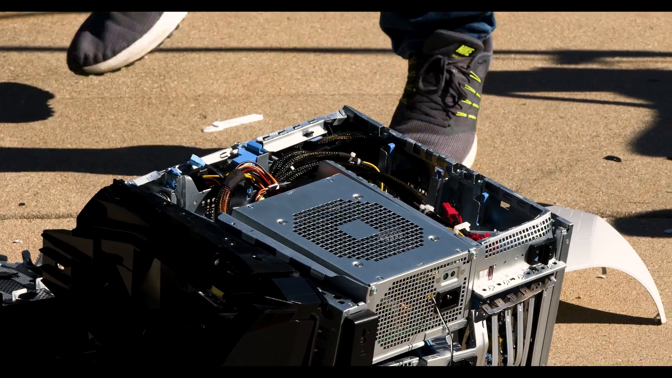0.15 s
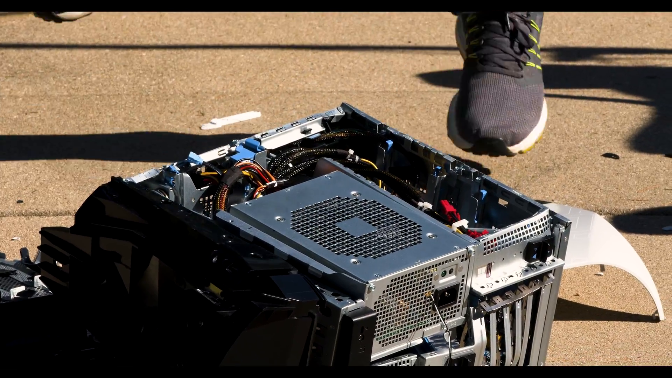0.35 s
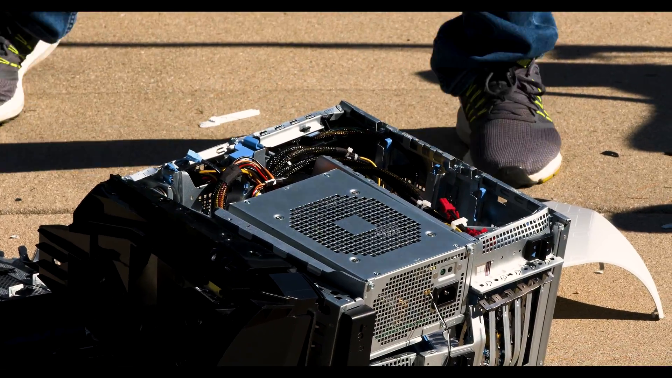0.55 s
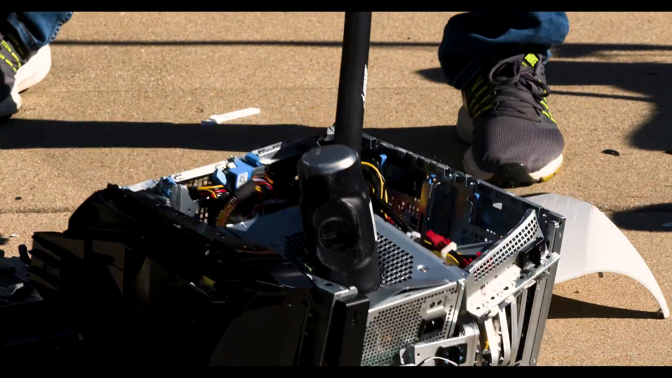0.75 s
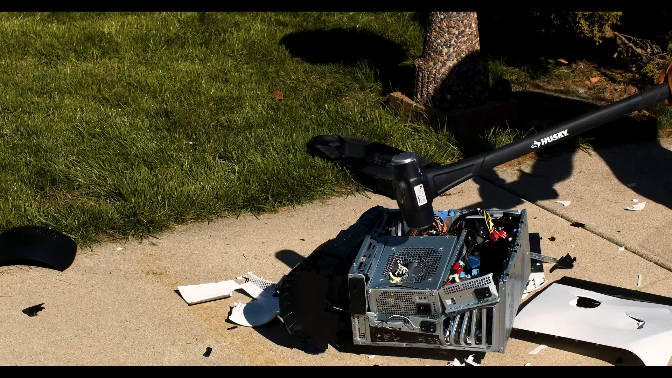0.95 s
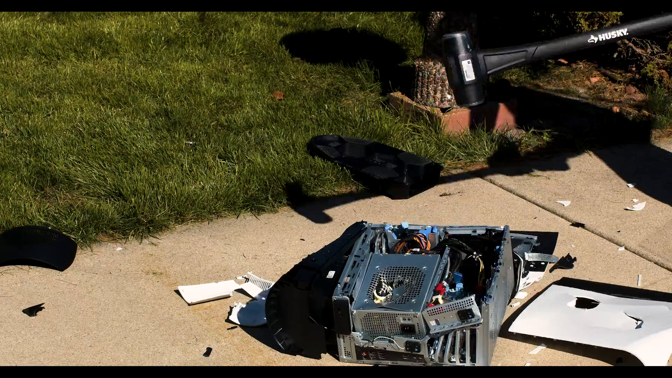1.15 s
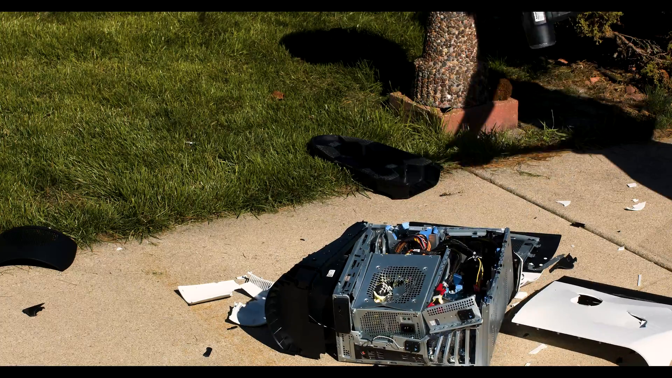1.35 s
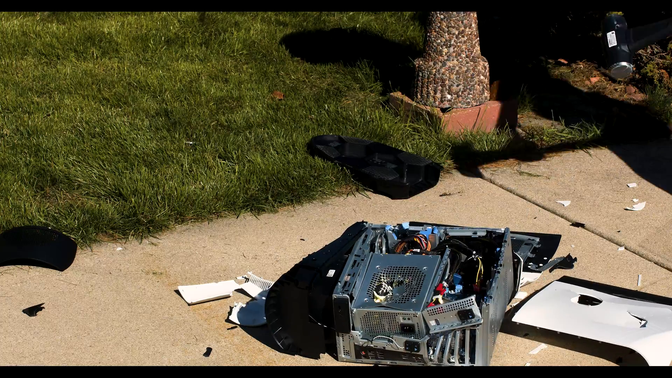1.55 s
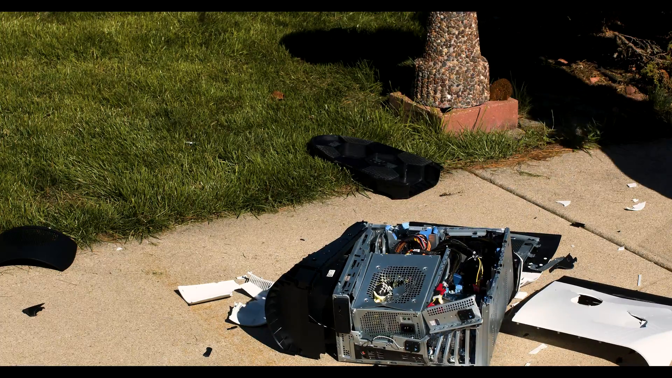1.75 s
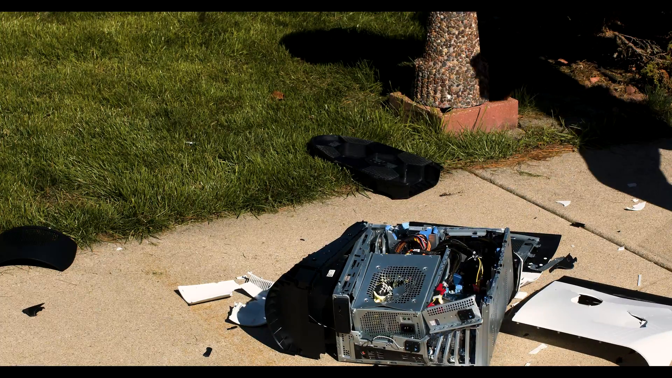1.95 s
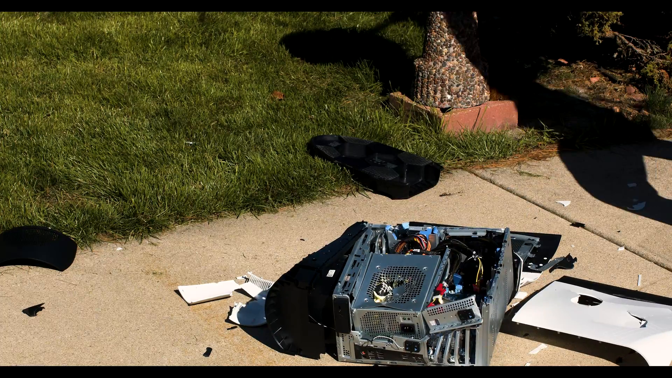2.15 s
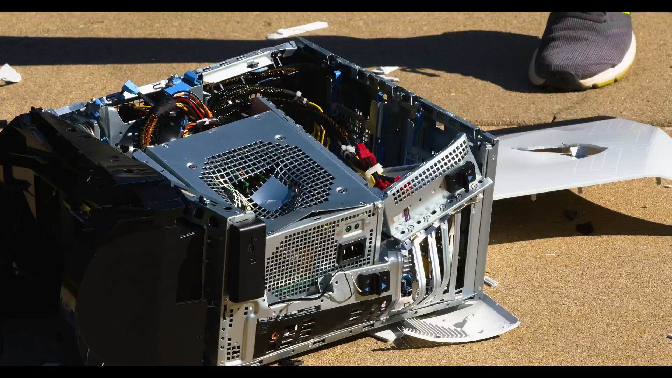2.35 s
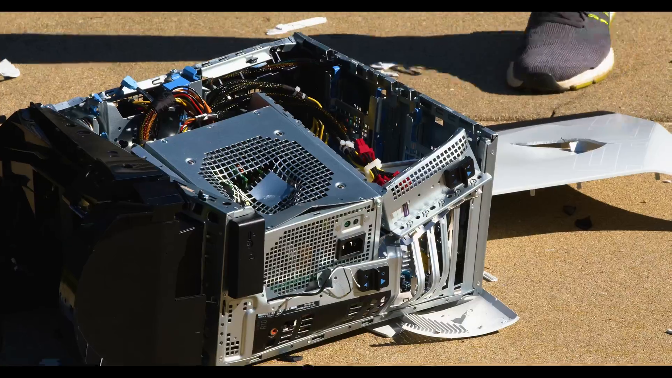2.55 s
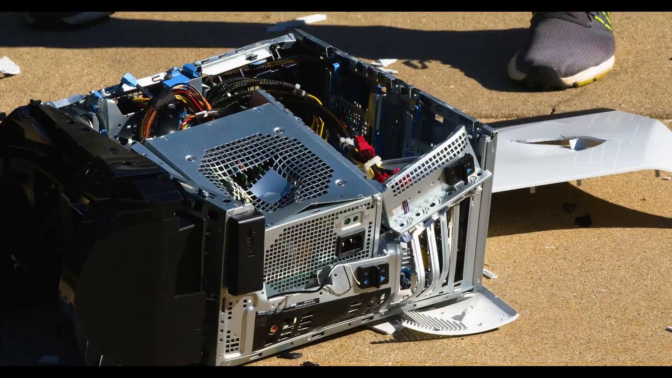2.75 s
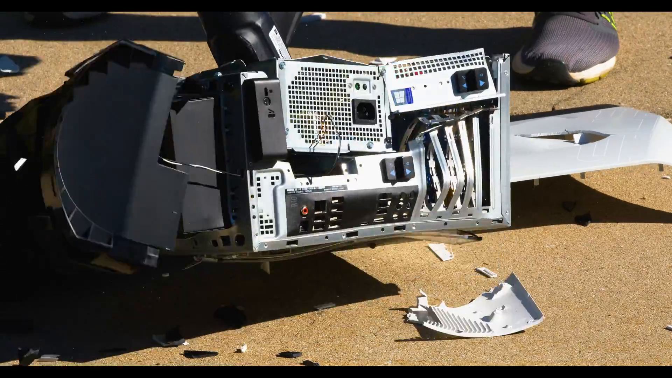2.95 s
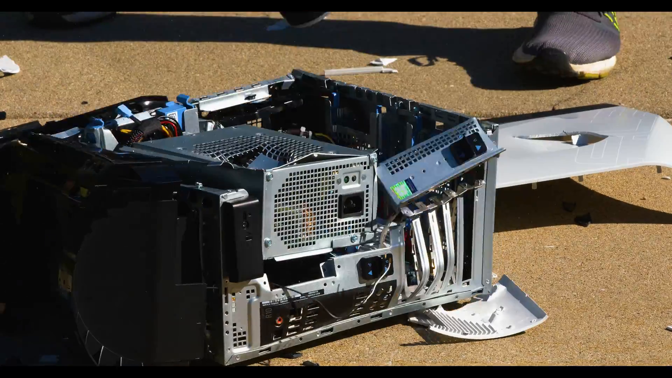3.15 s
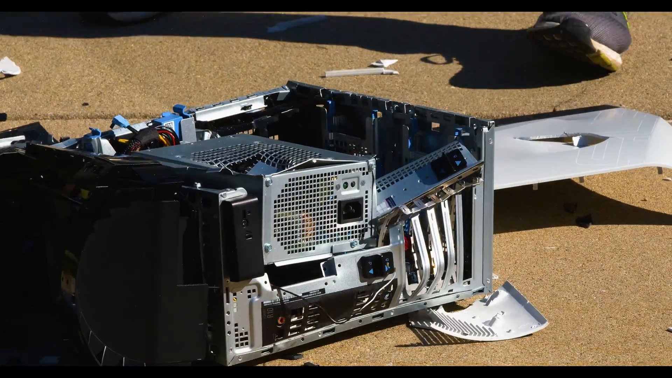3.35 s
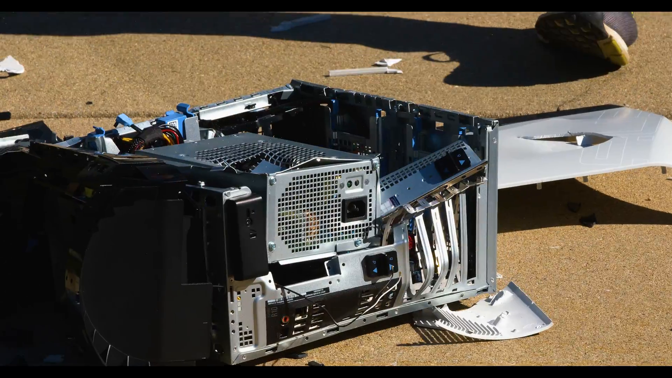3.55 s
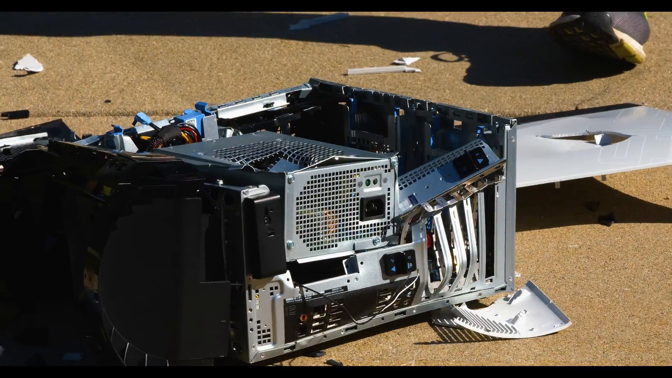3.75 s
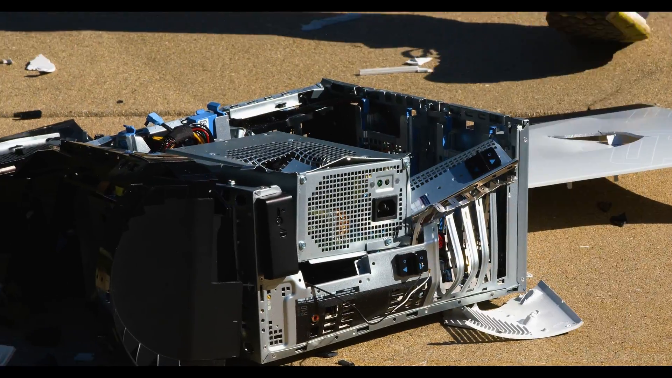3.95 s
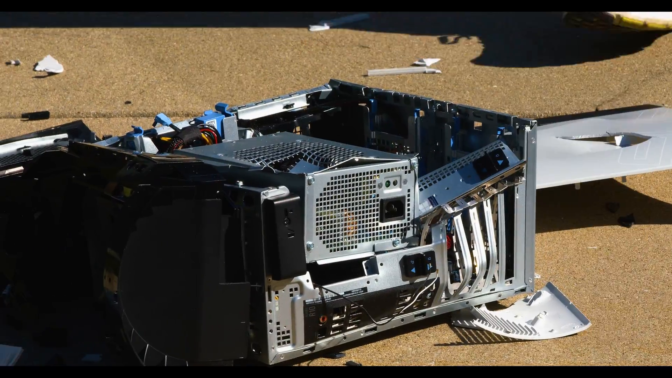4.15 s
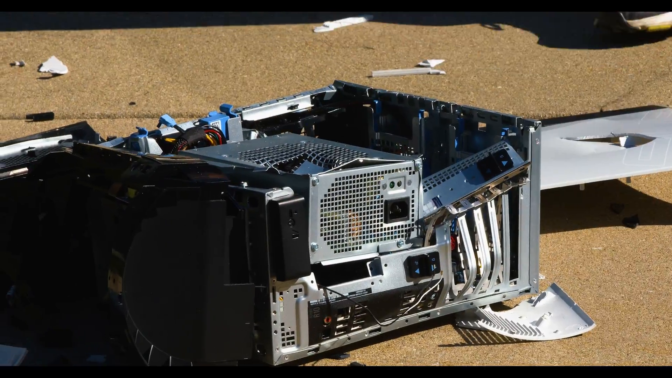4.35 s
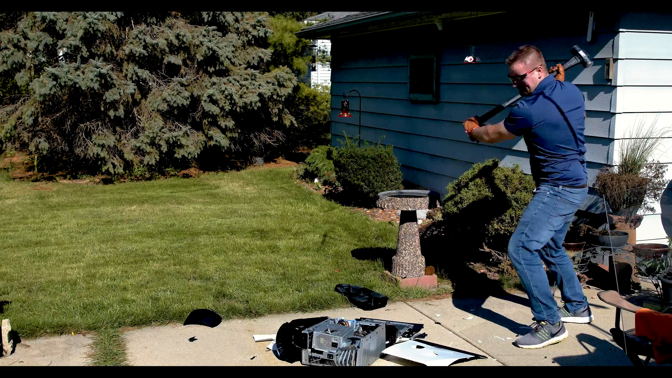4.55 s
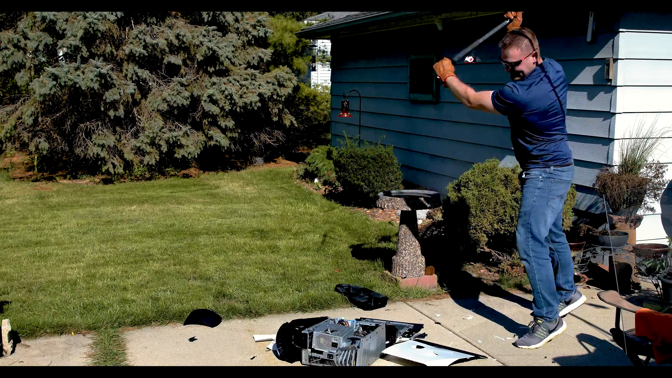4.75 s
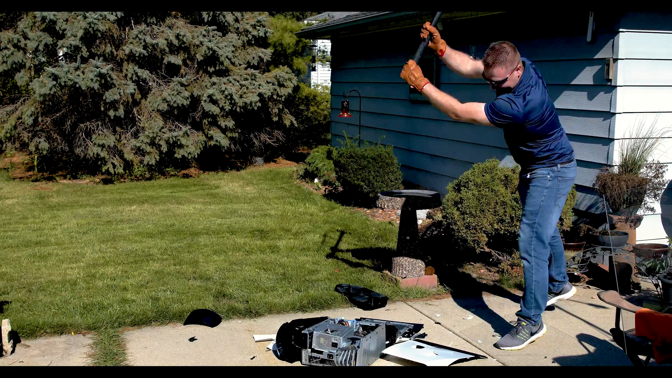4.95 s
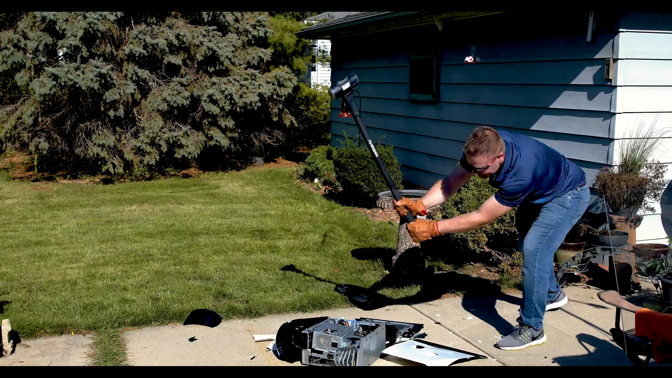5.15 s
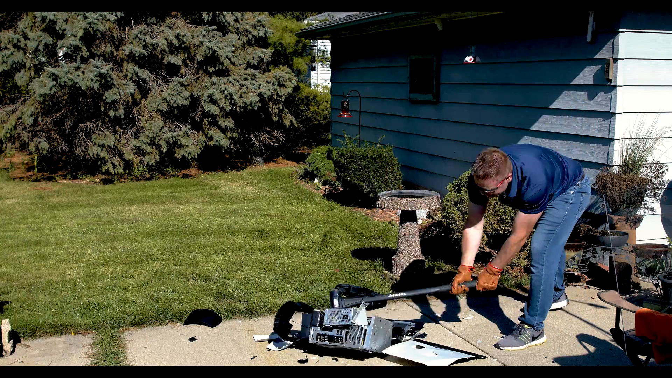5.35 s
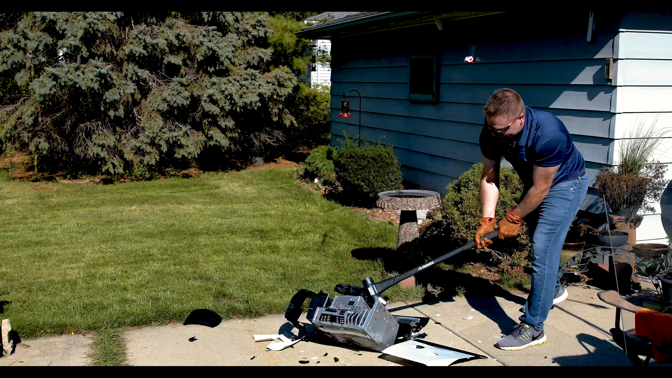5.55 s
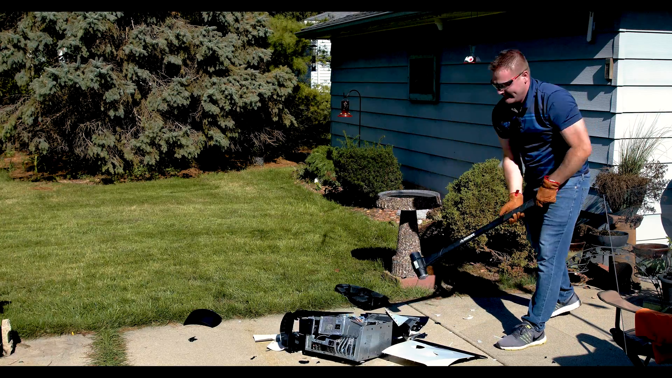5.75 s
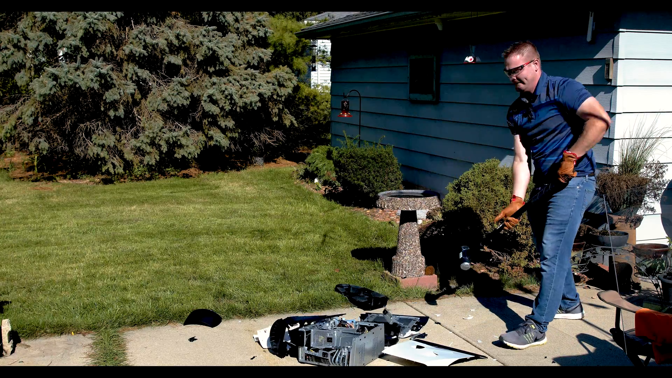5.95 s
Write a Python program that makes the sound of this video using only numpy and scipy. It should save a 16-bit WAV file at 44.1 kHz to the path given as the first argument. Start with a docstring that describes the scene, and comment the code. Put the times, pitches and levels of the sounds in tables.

```python
"""Light wind blows and small bits tick on concrete; gloves and shoes slide, and the wind swells with a swing.
A sledgehammer then falls three times on a sheet-metal computer case on a concrete path. Each blow brings
bangs, noisy rattling and a low shudder of the right microphone's stand; flying steel chimes after the first,
and thin panels ring on after the first two. Before the third, a loose metal bracket drops and bounces.
The left microphone rides on the man's shirt. Sounds are built from noise, resonances and fading tones."""
import sys
import numpy as np
from scipy import signal
from scipy.fft import rfft, irfft, next_fast_len
from scipy.io import wavfile
from scipy.ndimage import uniform_filter1d

SR = 44100
rng = np.random.default_rng(int(sys.argv[2]) if len(sys.argv) > 2 else 0)


def int16_out(signal):
    """Quantize to a 16-bit WAV file."""
    q = np.round(np.clip(np.atleast_2d(signal).T, -1, 1) * 32767)
    wavfile.write(sys.argv[1], SR, q.astype(np.int16))


N = 265035  # length [samples]

# Everywhere: row 0 is the left (shirt) microphone, row 1 the right (stand); positive pan [dB] leans left.
LEAD_S = .004  # the shirt is nearer to the case than the stand


def amp(db):
    """Turns decibels into a plain multiplier."""
    return 10 ** (np.asarray(db) / 20)


def evened(x):
    """Scales a sound to an average (rms) strength of 1."""
    return x / np.sqrt(np.mean(x ** 2, axis=-1, keepdims=True) + 1e-20)


def shaped(x, points):
    """Filters a sound by a curve of (frequency [Hz], gain [dB])."""
    hz, db = np.transpose(points)
    length = x.shape[-1]
    size = next_fast_len(length)
    f = np.fft.rfftfreq(size, 1 / SR)
    gain = amp(np.interp(np.log(f + 1), np.log(hz + 1), db))
    return irfft(rfft(x, size) * gain, size)[..., :length]


def band(x, lo_hz, hi_hz):
    """Keeps the part of a sound between two frequencies."""
    edges = [lo_hz, min(hi_hz, .45 * SR)]
    return signal.sosfilt(signal.butter(2, edges, "band", fs=SR, output="sos"), x)


def resonate(x, hz, width):
    """Shifts hz down to zero, smooths, shifts back: a resonance of gain 1, width in Hz."""
    turn = np.exp(2j * np.pi * np.cumsum(hz * np.ones(x.shape[-1])) / SR)
    r = np.exp(-np.pi * width / SR)
    smooth = signal.lfilter([1 - r], [1, -r], x / turn + 1e-18)
    return 2 * (turn * smooth).real


def unroll(rows):
    """Gives the start time and every other column of a table, sample by sample."""
    s, *columns = np.transpose(rows)
    t = np.arange(s[0], s[-1], 1 / SR)
    return s[0], [np.interp(t, s, c) for c in columns]


def add(mix, s, sound, pan_db=0, lead_s=LEAD_S):
    """Puts a pair of sounds in the mix; the shirt microphone hears them earlier by lead_s."""
    # keeps the summed power of both sides the same for any pan
    share = np.sqrt(np.cosh(pan_db * np.log(10) / 20) / 2)
    for k, side in enumerate((1, -1)):
        start = max(round((s - (1 - k) * lead_s) * SR), 0)
        part = mix[k, start:][:sound.shape[-1]]
        part += (sound[k] * amp(side * pan_db / 2) / share)[:len(part)]


def pair(size, same):
    """Noise for both microphones, alike by the share same."""
    a, b = rng.standard_normal((2, size))
    same = np.clip(same, 0, 1)
    return np.array([a, same * a + np.sqrt(1 - same ** 2) * b])


# colour of the distant air noise: (frequency [Hz], level per Hz [dB])
AIR_COLOUR = [(10, -45), (30, -11), (60, -2.5), (110, -9.5), (250, -18), (450, -20.5), (1400, -22.5),
              (3400, -32), (8000, -38.5), (16500, -39)]
AIR_DB, AIR_PAN_DB = -63, 1
# wind during each swing: (start [s], full [s], fading from [s], level [dB])
SWING_WIND = [(0.447, 0.626, 1.29, -52), (2.672, 2.78, 3.33, -48.5), (5.046, 5.32, 6.01, -50)]
CALM_DB, WIND_FADE_DB_PER_S = -74.5, 110


def outdoors():
    """Distant air noise in both microphones, and lumpy low wind mostly on the shirt."""
    air = amp(AIR_DB) * evened(shaped(pair(N, 0.035), AIR_COLOUR))
    air = air * amp([[AIR_PAN_DB / 2], [-AIR_PAN_DB / 2]])
    t = np.arange(N) / SR
    swings = []
    for start, full, fading, db in SWING_WIND:
        swell_db = np.interp(t, [start, full], [CALM_DB, db])
        swings.append(swell_db - WIND_FADE_DB_PER_S * np.maximum(t - fading, 0))
    lumps = amp(9 * evened(band(rng.standard_normal(N), 0.53, 36)))
    rumble = band(pair(N, 0), 24, 123)
    gusts = evened(band(rumble * lumps, 37, 390)) * amp([[5], [-6]])
    return air + gusts * amp(np.max(swings, 0))


# small bits on concrete: (time [s], level [dB], pitch [Hz], body re click ring [dB], pan [dB])
BITS = [(.012, -59, 2200, 2, -6), (0.121, -67, 3000, -11, 1), (.168, -60, 5100, -6, 3),
        (0.537, -43, 2440, 19, -7), (0.605, -43.5, 2620, 8, -3), (0.638, -47, 1980, 20, 0),
        (0.739, -55, 2000, -13, 7), (0.784, -48.5, 2210, 4, 1), (1.558, -41, 2890, -9, -9),
        (1.6261, -41, 8600, -21, -8), (1.6577, -44.5, 4370, -19, -4), (1.716, -37.5, 1980, -27, -5),
        (1.83, -42.5, 8400, -10, -3), (1.951, -52, 2210, 6, 1.5), (2.0754, -49.5, 2230, 20, -1.5),
        (2.1, -56, 2560, 10, 1.5), (2.2694, -54, 1970, 10, -4), (2.402, -68, 2474, -3, 0),
        (2.799, -37, 2720, 5.5, 1), (3.56, -47, 4200, -11, -6), (3.593, -54, 3920, -2, -4.5),
        (5.1588, -44, 2620, 6, 0), (5.287, -55.5, 2790, -17, 0), (5.3448, -56, 4970, -9, 9)]


def ticks(mix):
    """Light bits: a quickly dying noise click excites a short ring and a dull body."""
    t = np.arange(round(.08 * SR)) / SR
    for s, db, hz, body_db, pan_db in BITS:
        fade = amp(-60 * t / .03) + amp(-12 - 60 * t / .12)
        click = pair(len(t), .3) * fade
        tick = evened(resonate(click, hz, 0.3 * hz))
        tick = tick + 0.27 * evened(band(click, 1300, 12500))
        tick = tick + amp(body_db) * evened(band(click, 200, 2450))
        add(mix, s, amp(db) * tick / abs(tick).max(), pan_db)


# gloves and soles sliding: (loudest at [s], rise [s], fall [s], level [dB], centre [Hz],
# scrape re hiss [dB], pan [dB])
FRICTION = [(0.326, 0.067, 0.14, -56, 7300, -10, 6), (0.443, 0.061, 0.044, -52.5, 4700, -10.5, 6.5),
            (.598, 0.12, 0.051, -57, 5100, -3, -1.5), (2.664, 0.17, 0.059, -52.5, 5230, -15, 2),
            (3.687, 0.082, 0.07, -67, 7250, -1, 3), (3.829, 0.065, 0.081, -57, 7500, -38, -2.5),
            (4.19, 0.017, 0.088, -77, 5400, 12, -3), (4.47, .25, 0.32, -65, 8400, 7, 11),
            (4.758, .16, 0.14, -61.5, 6000, 4.5, 4.5), (4.88, 0.13, 0.25, -74, 5400, 8.5, 10),
            (5.02, .09, 0.071, -63, 6070, -22, 7), (5.08, .13, 0.083, -57.5, 8500, -23, 8),
            (5.09, .09, 0.076, -55, 4300, -6.5, -0.5)]
SLIDE_FADE_DB = -25.5  # change in level one rise before and one fall after the loudest moment


def slides(mix):
    """Friction: fine hiss around a broad centre, over a duller scrape; it swells and fades."""
    for s, rise, fall, db, hz, scrape_db, pan_db in FRICTION:
        t = np.arange(-1.5 * rise, 1.5 * fall, 1 / SR)
        roughness = evened(uniform_filter1d(rng.standard_normal(len(t)), size=60))
        grit = pair(len(t), 0) * (0.5 + 0.062 * roughness)
        centre = evened(resonate(resonate(grit, hz, 3000), hz, 3000))
        hiss = evened(centre + .8 * evened(band(grit, 3000, 14000)))
        scrape = amp(scrape_db) * evened(band(grit, 310, 4070))
        shape = amp(SLIDE_FADE_DB * np.maximum(-t / rise, t / fall) ** 2.15)
        add(mix, s + t[0], amp(db) * (hiss + scrape) * shape, pan_db)


# gusts hitting the shirt: (start [s], level [dB], pitch [Hz])
GUST_PUSHES = [(.812, -39.5, 118), (0.835, -43, 120), (2.829, -41, 105), (5.321, -32, 99.5)]


def thumps(mix):
    """A gust pushes the shirt microphone for two or three cycles, the other one far less."""
    for s, db, hz in GUST_PUSHES:
        t = np.arange(round(2.8 / hz * SR)) / SR
        push = amp(db) * np.sin(2 * np.pi * hz * t) * np.hanning(len(t))
        add(mix, s, np.outer([1, .1], push))


# moments when the hammer lands: (time [s])
HAMMER_TIMES = [0.875, 2.908, 5.384]
# far right at the strike, near the centre soon after, then drifting right
STRIKE_PAN_DB, STRIKE_PAN_S, SETTLED_PAN_DB, DRIFT_DB_PER_S = -14.5, 0.03, -1.05, -6


def balance(s):
    """Left-right dB of the case at time s, counted from the latest blow."""
    latest = np.searchsorted(HAMMER_TIMES, s + .01) - 1
    since = s - np.take(HAMMER_TIMES, latest)
    strike = STRIKE_PAN_DB * np.exp(-(since / STRIKE_PAN_S) ** 2)
    return SETTLED_PAN_DB + strike + DRIFT_DB_PER_S * since


def clinks(size, count, per_s, t60, spread_db):
    """Loose parts of many sizes: each collision rings one briefly, with decay time t60 at 1500 Hz."""
    t, out = np.arange(round(.08 * SR)) / SR, np.zeros((2, size))
    for hz in np.geomspace(400, 12000, count) * rng.uniform(1.0, 1.05, count):
        strength = amp(spread_db * np.minimum(rng.exponential(1, size), 4))
        hits = strength * (rng.random(size) < per_s / count / SR)
        fade = amp(-60 * t / t60 * (hz / 1500) ** 0.31)  # higher pitches die sooner
        ring = np.sin(2 * np.pi * hz * t + 2 * np.pi * rng.random((2, 1))) * fade
        ring = ring * amp(2 * rng.standard_normal((2, 1)))
        out += signal.oaconvolve(hits[None], ring, axes=1)[:, :size]
    return evened(out)


# rattling, one list per blow: (time [s], level [dB], treble re level [dB])
RATTLE_LEVELS = [
    [(.876, -38, -3), (.935, -35, -7), (1.05, -43, -0.5), (1.118, -45, -12), (1.14, -37, -3),
     (1.24, -38.5, -5.5), (1.29, -35.5, -16), (1.33, -40.5, -4), (1.375, -36.5, -3), (1.45, -38.5, -6.5),
     (1.6, -53.5, -18), (1.66, -54, -7), (1.8, -66.5, -14), (2.2, -81.5, -11)],
    [(2.909, -37.5, 2), (2.95, -36.5, -26), (3.05, -40, -9), (3.12, -35.5, -25), (3.19, -36, -5),
     (3.225, -33, -9.5), (3.28, -34.5, -2.5), (3.34, -36, -9), (3.39, -41.5, -6.5), (3.48, -49.5, -5),
     (3.6, -68.5, -4.5), (3.8, -80, -3)],
    [(5.384, -45, -24), (5.44, -31.5, -6.5), (5.52, -31.5, -8), (5.6, -33, -8), (5.7, -37, -8),
     (5.79, -50, 2), (5.81, -38.5, -9), (5.845, -32, -6), (5.875, -43, -9), (5.92, -32, -5),
     (6.01, -39.5, -18)],
]
# colour of the debris: (frequency [Hz], level per Hz [dB])
DEBRIS_COLOUR = [(100, 34), (500, 7), (2000, 0.5), (11000, -3.5), (16500, -20)]
# resonances of the case panels, also used by the knocks: (pitch [Hz], width setting [Hz], level [dB])
PANELS = [(388.5, 20, -3), (480, 50, -24), (597, 160, 0), (687, 44, -1), (850, 77, 5.5), (1111, 26, 11.5),
          (1410, 91, -33), (1830, 97, -12), (2060, 27, -11), (3300, 20, -5), (3800, 53, -12)]
CLANG_DB, THUD_DB = -6.5, -21.5  # low and lowest parts re the middle


def rattle(mix):
    """Thousands of small collisions: fizz of debris, clinking parts, and the panels they shake."""
    for rows in RATTLE_LEVELS:
        s, (db, treble_db) = unroll(rows)
        size = len(db)
        strength = amp(1.7 * np.minimum(rng.exponential(1, size), 5))
        hits = strength * (rng.random(size) < 600 / SR)  # about 600 a second
        # each collision dies in ms
        bursts = 0.59 + evened(signal.lfilter([1], [1, -np.exp(-1 / (0.0015 * SR))], hits))
        drive = pair(size, 0.037) * bursts
        panels = evened(sum(amp(d) * resonate(drive, f, 1.24 * w) for f, w, d in PANELS))
        parts = clinks(size, count=36, per_s=900, t60=0.035, spread_db=-1.5)
        fizz = evened(shaped(drive, DEBRIS_COLOUR)) + 0.33 * shaped(parts, DEBRIS_COLOUR)
        low = evened(band(1.6 * panels + fizz, 370, 1160)) * amp(CLANG_DB)
        middle = evened(band(0.31 * panels + fizz, 1415, 5370))
        treble = evened(band(fizz, 8400, 24000)) * amp(treble_db)
        thud = evened(band(drive, 54, 416)) * amp(THUD_DB) * amp([[-4], [3]])
        edge = signal.windows.tukey(size, 0.0007 * SR / size)
        sound = amp(db) * (low + middle + treble + thud) * edge
        add(mix, s, sound, balance(s + np.arange(size) / SR))


# blows and bounces of the case: (time [s], level [dB], clang pitch [Hz], crack re level [dB],
# decay setting [s])
CASE_HITS = [(0.876, -24.5, 402, 3.5, 0.13), (1.063, -19.5, 702, -24, 0.19), (1.087, -19, 666, -20, 0.1),
             (1.129, -17.5, 1134, -4, 0.14), (1.167, -27.5, 480, 4, 0.072), (1.261, -24.5, 865, 5.5, 0.12),
             (1.34, -30.5, 1460, 5.5, 0.18), (1.36, -26.5, 522, -1.5, 0.28), (1.44, -41, 1500, 9.5, 0.25),
             (1.525, -32, 575, -8, 0.085), (2.908, -29.5, 584, 8.5, 0.36), (2.979, -33.5, 2260, 9.5, 0.21),
             (3.028, -28, 593, 2.5, 0.25), (3.05, -36.5, 2600, 15, 0.073),
             (3.109, -37.5, 1480, 16.5, 0.053), (3.137, -28, 445, 8.5, 0.083),
             (3.21, -26.5, 470, 5.5, 0.26), (3.228, -26.5, 520, 0.5, .15), (3.262, -35.5, 1420, 7.5, 0.36),
             (3.352, -25.5, 522, 0.5, .15), (3.49, -36.5, 570, 5.5, 0.029), (5.383, -25.5, 646, 2, 0.31),
             (5.466, -33.5, 2340, 9, 0.34), (5.537, -25.5, 1174, 2, .2), (5.58, -36, 1250, 12, 0.27),
             (5.706, -28.5, 474, 4, 0.22), (5.754, -37, 2520, 15, 0.055), (5.802, -25.5, 1120, 4, 0.085),
             (5.82, -21.5, 2021, -2, 0.1), (5.883, -36.5, 2600, 13, .1), (5.924, -23, 574, 0.5, .2),
             (5.954, -25.5, 710, -20, 0.14), (5.99, -32.5, 1500, 5.5, 0.078)]
BLUNT_SHARE, CRACK_SHARE = 0.46, 1.74  # 60 dB decay time of body and crack, per decay setting
CLANG_SPREAD = 6.9  # clang width [Hz] times decay setting [s]
KNOCK_PAN_DB, CRACK_PAN_DB = -1.6, 0  # re the rattle: bodies lean further right, cracks do not


def knocks(mix):
    """A crack and a blunt body, then the struck panel and its neighbours clang briefly."""
    t = np.arange(round(.25 * SR)) / SR
    for s, db, hz, crack_db, decay in CASE_HITS:
        blow = pair(len(t), 0.67) * amp(-60 * t / (BLUNT_SHARE * decay))
        neighbours = evened(sum(amp(d) * resonate(blow, f, w) for f, w, d in PANELS))
        clang = evened(resonate(blow, hz, CLANG_SPREAD / decay)) + 0.55 * neighbours
        clang = clang + 0.35 * evened(band(blow, 395, 2470))
        crack = band(pair(len(t), 0.71), 670, 12600) * amp(-60 * t / (CRACK_SHARE * decay))
        add(mix, s, amp(db) * clang / abs(clang).max(), balance(s + t) + KNOCK_PAN_DB)
        add(mix, s, amp(db + crack_db) * crack / abs(crack).max(), balance(s + t) + CRACK_PAN_DB)


# jolts of the ground that set the stand swaying: (time [s], level [dB])
JOLTS = [(0.898, -34), (1.17, -41), (1.34, -51), (2.92, -37), (3.24, -49), (3.37, -54.5), (5.39, -31.5),
         (5.55, -39), (5.72, -61), (5.86, -49.5), (5.95, -39)]
STAND_HZ, SWAY_RISE_S, SWAY_T60 = 63.1, 0.074, 0.8  # T60 [s]: time to fade by 60 dB


def shudder(mix):
    """The stand sways at its own pitch, building after each jolt and fading: nearly all on the right."""
    t = np.arange(N) / SR
    jolt_s, jolt_db = np.array(JOLTS)[:, :1], np.array(JOLTS)[:, 1:]
    since = np.maximum(t - jolt_s, 0)
    fade = amp(jolt_db - 60 * np.maximum(since - SWAY_RISE_S, 0) / SWAY_T60)
    jolts = fade * np.minimum(since / SWAY_RISE_S, 1) ** 2
    rumble = evened(band(band(rng.standard_normal(N), 36, 77), 36, 77))
    sway = np.sqrt(2) * np.sin(2 * np.pi * STAND_HZ * t) + 0.35 * rumble
    strength = np.sqrt((jolts ** 2).sum(0))
    add(mix, 0, np.outer([.03, 1.4], strength * sway), lead_s=0)


# a small steel part in flight: (time [s], level [dB], pitch [Hz], time to fade by 60 dB [s])
STEEL_CHIMES = [(.925, -41.5, 11040, 0.5), (.99, -24, 9300, 0.026), (1.005, -27, 11200, 0.044),
                (1.015, -39, 11530, 0.24), (1.032, -33, 9160, 0.033), (1.047, -41, 8860, 0.23)]


def chimes(mix):
    """A small steel part chimes while it flies: short fading tones with a noisy halo."""
    t = np.arange(round(.09 * SR)) / SR
    for s, db, hz, t60 in STEEL_CHIMES:
        tone = np.sin(2 * np.pi * hz * t) + 0.51 * evened(resonate(pair(len(t), 0), hz, 57))
        add(mix, s, tone * amp(db - 60 * t / t60) * signal.windows.tukey(len(t), .1), -8)


# thin panels ringing on, at other pitches after the next dent:
# (start [s], pitch [Hz], level [dB], time to fade by 60 dB [s])
PANEL_RINGS = [(1.32, 10720, -69, 1.5), (1.519, 3978, -69.5, 3.9), (1.5, 476, -72, 1.4),
               (1.6, 2866, -65.5, 1.3), (1.7, 1680, -64, 1.6), (1.72, 1604, -67, 2.75),
               (3.339, 11860, -55.5, 0.66), (3.4, 3940, -73, 5.5), (3.42, 532, -68, 0.83),
               (3.42, 1576, -68, 1.3), (3.6, 1654, -66.5, 1.3), (3.63, 1732, -70, .75),
               (3.66, 1740, -69, 0.94)]
# moments when the ringing stops, the first at the next blow: (time [s])
RING_STOPS = (2.9, 4.2)
SWELL_S = .12


def rings(mix):
    """Long panel tones, the low ones fuzzier, swell out of the rattle and fade until they stop."""
    for s, hz, db, t60 in PANEL_RINGS:
        end = min(e for e in RING_STOPS if e > s)
        t = np.arange(s, end, 1 / SR) - s
        fuzz = 1300 / hz * evened(resonate(pair(len(t), 0), hz, 36))
        tone = np.sin(2 * np.pi * (hz * t + rng.random((2, 1)))) + fuzz
        swell = np.minimum(t / SWELL_S, 1) ** 2
        fade = amp(-60 * np.maximum(t - SWELL_S, 0) / t60)
        shape = swell * fade * signal.windows.tukey(len(t), .02)
        add(mix, s, amp(db) * tone * shape, -6.5)


# ways a loose metal bracket rings: (pitch [Hz], level [dB], ring length setting [s])
BRACKET_MODES = [(1300, -28, 0.25), (1344, 6, 0.31), (1470, 10.5, 0.023), (1722, 9, 0.041),
                 (2214, 3.5, 0.086), (2230, -8, 0.93), (2280, -23, 0.046), (2850, -23, 0.068),
                 (3150, -1.5, 0.043), (3840, 8, 0.046), (3860, -4, 0.21), (5100, -12.5, 0.28),
                 (6250, -28, 0.11)]
# the bracket drops and bounces: (time [s], level [dB], crack re ring [dB], favoured pitch [Hz],
# time for the chatter to fade by 60 dB [s])
BRACKET_DROPS = [(4.239, -23.5, -11, 2300, 0.056), (4.251, -20.5, -31, 2490, 0.13),
                 (4.266, -29, -27, 3900, 0.028), (4.299, -33, -26, 1830, 0.24),
                 (4.528, -41, -19, 2000, 0.025), (4.535, -26, -16, 1330, 0.039),
                 (4.58, -39, -6, 2190, 0.04), (4.682, -44.5, -11, 1400, 0.063),
                 (4.744, -46.5, -15, 3040, 0.059)]
DROP_PAN_DB = -4


def bracket(mix):
    """Fading chatter excites the modes, most those near the favoured pitch, with crack, thud and tail."""
    t = np.arange(round(.5 * SR)) / SR
    for s, db, crack_db, spot_hz, t60 in BRACKET_DROPS:
        hit = amp(-60 * t / t60)
        chatter = pair(len(t), 0.067) * (hit + amp(-14.0 - 60 * t / 0.36))  # hit and quieter tail
        ring = 0
        for f, d, length in BRACKET_MODES:
            near = amp(d - 17.6 * abs(np.log2(f / spot_hz)))  # 17.6 dB weaker per octave away
            ring = ring + near * np.sqrt(length) * resonate(chatter, f, 3.7 / length)
        wash = band(chatter, 1400, 3560)
        crack = band(pair(len(t), .1), 3200, 11000) * (hit + amp(-22 - 60 * t / 0.15))
        thud = band(chatter, 333, 1280)
        parts = ring / abs(ring).max() + 0.36 * wash / abs(wash).max()
        parts = parts + amp(crack_db) * crack / abs(crack).max()
        parts = parts + 0.14 * thud / abs(thud).max()
        add(mix, s, amp(db) * parts, DROP_PAN_DB, lead_s=-.002)  # the stand hears it first


def scene():
    """Lays every source over the outdoor noise."""
    mix = outdoors()
    for source in (ticks, slides, thumps, rattle, knocks, shudder, chimes, rings, bracket):
        source(mix)
    return mix


# colour of the covered microphone: (frequency [Hz], gain [dB])
SHIRT_COLOUR = [(20, -10), (450, 5), (900, 2), (1400, -1.5), (2100, 1.5), (4500, 1), (8000, -1.5),
                (12000, -2.5), (16500, -7)]
OFFSET = -0.0016  # converter offset
EDGE_HZ = 16400  # upper band limit


def record(dry):
    """Cloth colours the shirt microphone; peaks are softly rounded; then the band limit."""
    both = np.array([shaped(dry[0], SHIRT_COLOUR), dry[1]])
    both = 0.45 * np.tanh(both / 0.36) + OFFSET
    lowpass = signal.firwin(511, EDGE_HZ, window=("kaiser", 9), fs=SR)
    return signal.oaconvolve(both, lowpass[None], "same")


dry = scene()
out = record(dry)
int16_out(out)
```